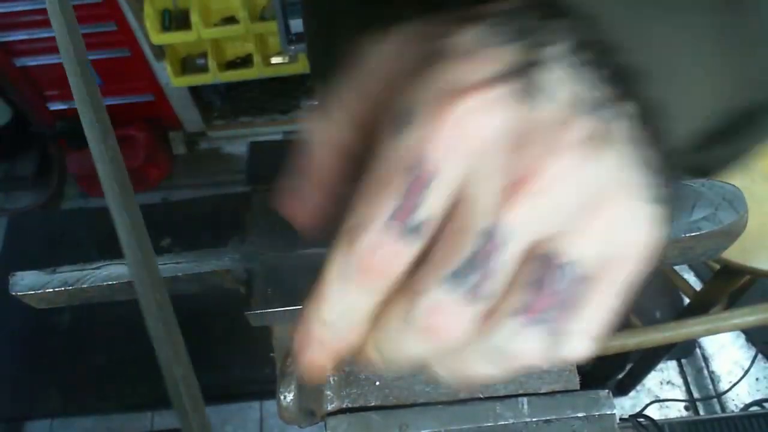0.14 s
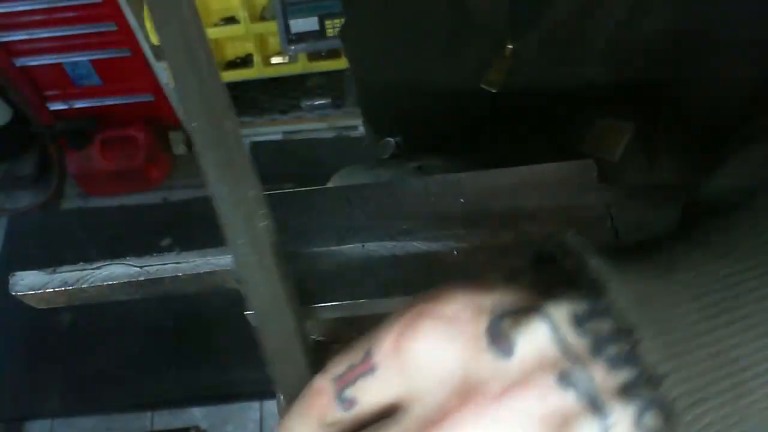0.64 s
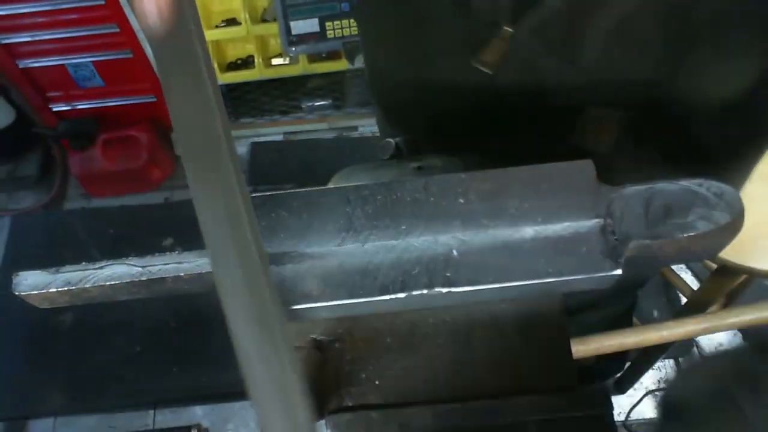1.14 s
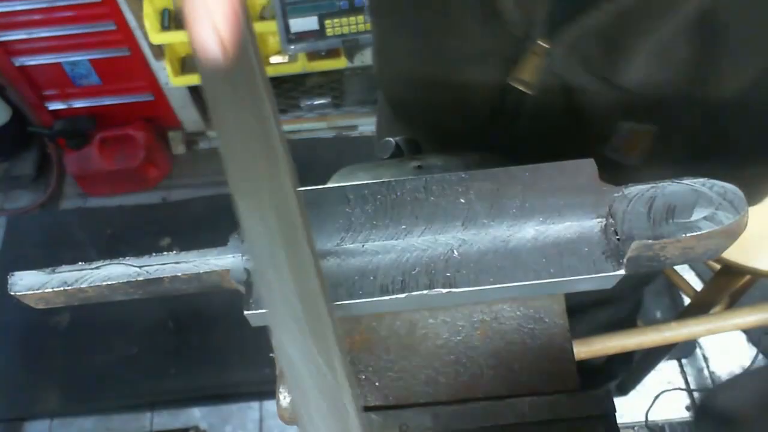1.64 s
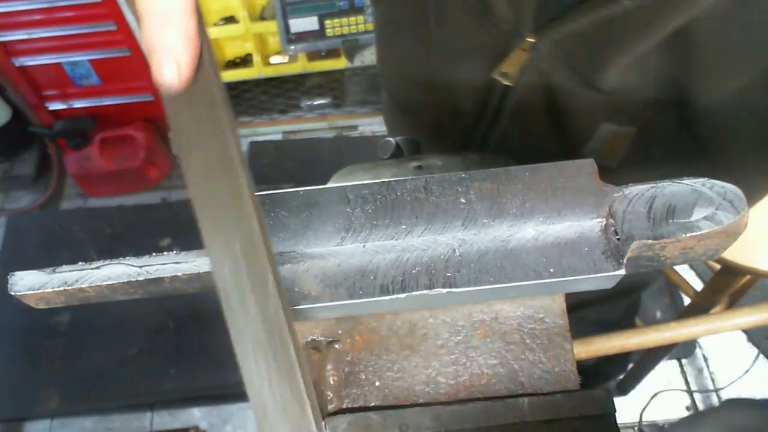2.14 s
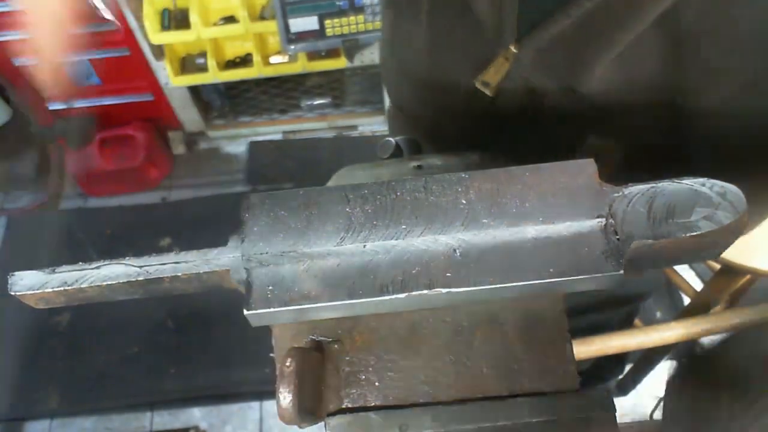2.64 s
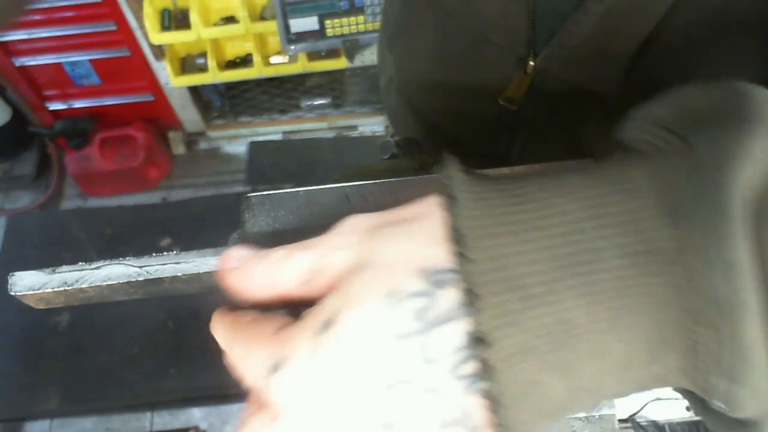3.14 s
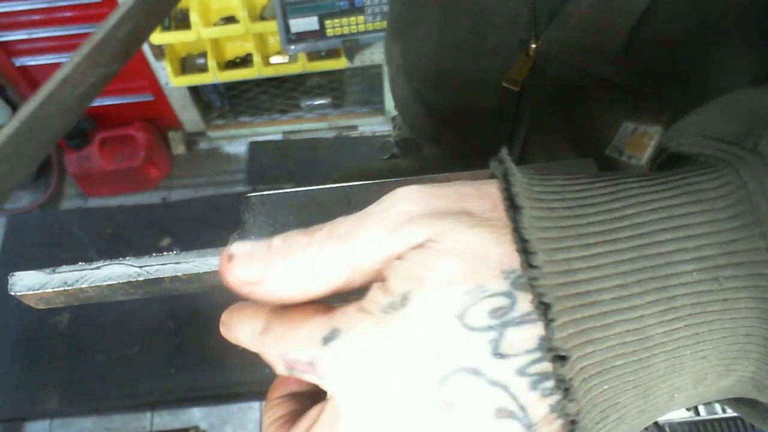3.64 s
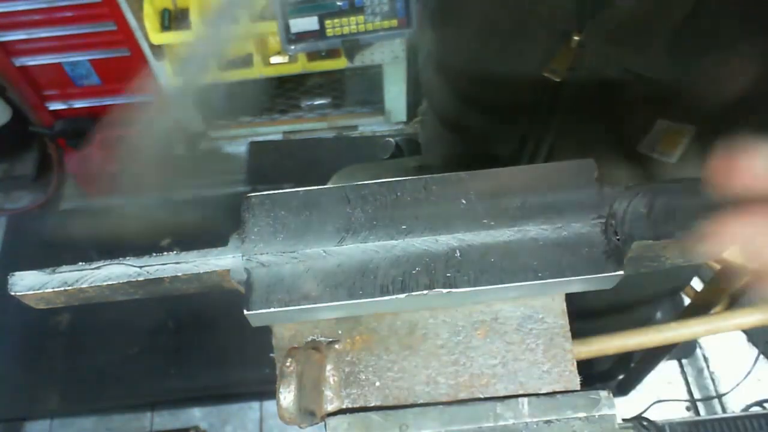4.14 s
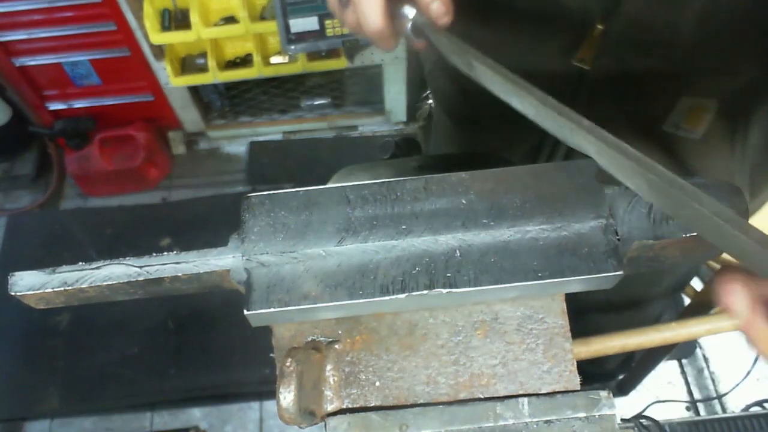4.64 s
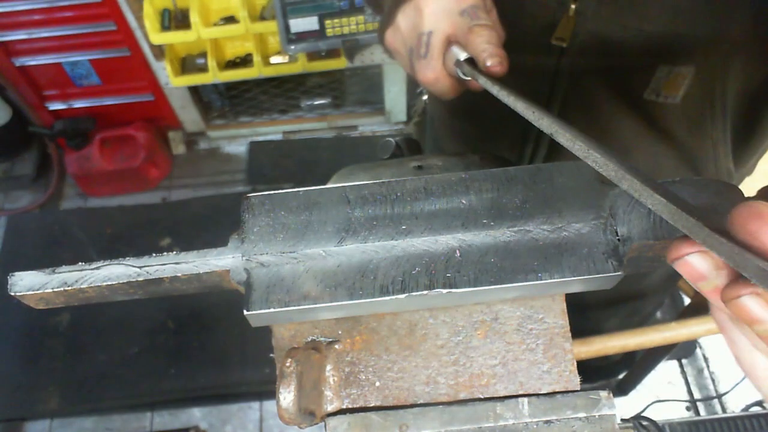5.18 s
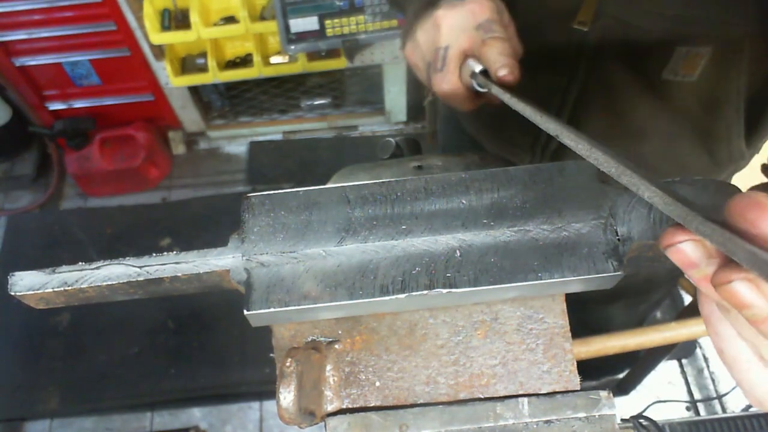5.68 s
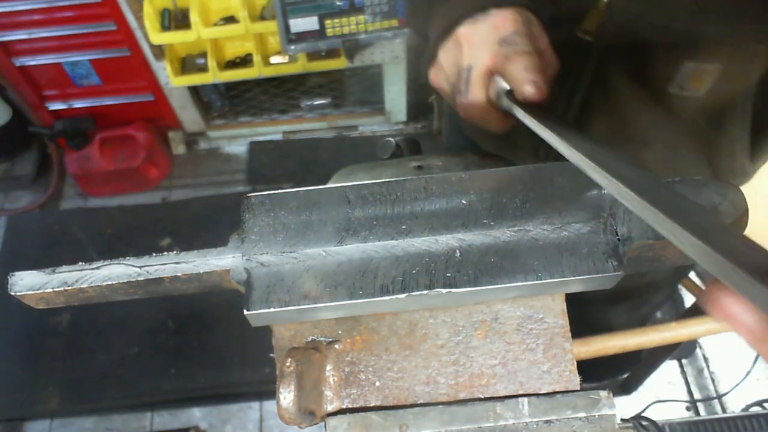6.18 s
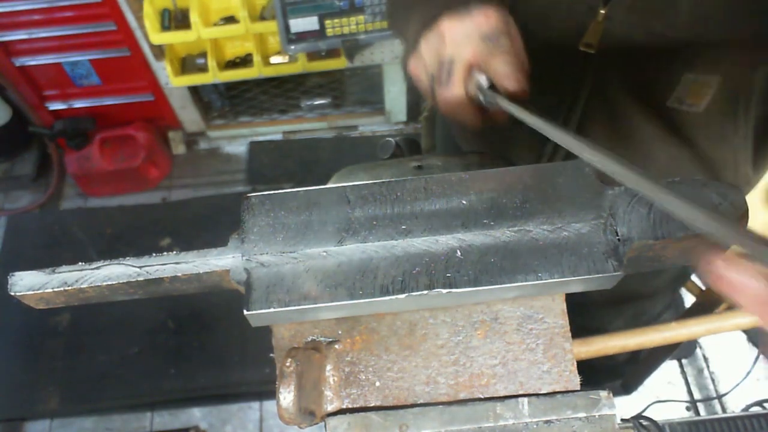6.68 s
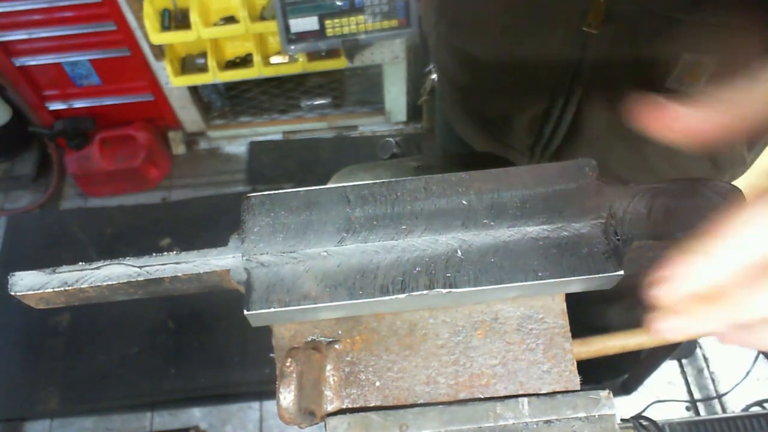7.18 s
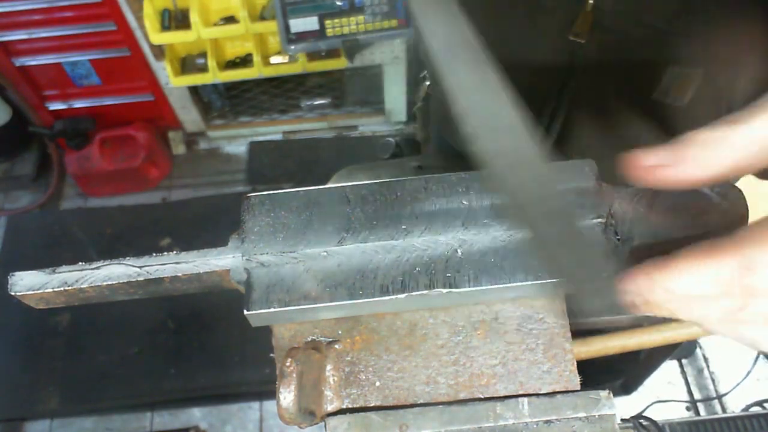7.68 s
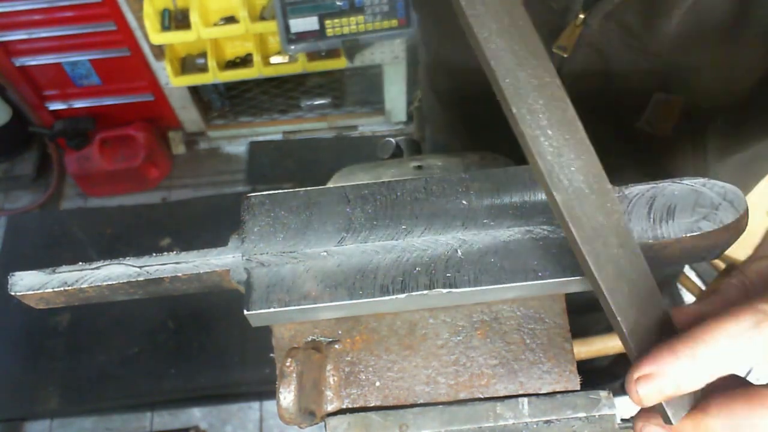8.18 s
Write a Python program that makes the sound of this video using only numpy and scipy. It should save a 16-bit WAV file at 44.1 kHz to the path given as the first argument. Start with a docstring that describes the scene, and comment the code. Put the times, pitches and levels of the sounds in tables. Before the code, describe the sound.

A close, dry workshop sound, left channel only, with quiet hiss, a thin rapidly chopped electronic whine and faint low bench shake throughout. From 0 to 1 s a hand rubs over steel, with light metal taps and dull bench thuds around 0.4 to 0.9. From about 1.0 to 2.5 s short file strokes rasp, each a tenth or two long, gritty and high, with buzzy vise squeals and small snags; a sharper tap lands at 1.7. Then a quieter stretch: skin and sleeve rubs, tiny ticks, a dull thud near 3.9, a clear metal tap at 4.6 and smaller ones after. Faint file contact at 5.4 and scattered taps precede a second run, 6.0 to 6.8 s, louder and brighter, strongest near 6.2 and 6.5, squealing as it ends. A rub at 6.9, then hard ringing metal knocks at 7.5, 7.9 and 8.0, and a faint last tap.

```python
"""Close to a small camera in a shop, its hiss and frame-chopped whine run throughout over a faint bench shake.
Hand rubs, light taps and dull bench thuds lead to a run of short file strokes over a steel block in a vise.
After a pause with rubs, ticks and taps, a second run follows with the file gripped in both hands and ringing
at other pitches; hard taps end it. Each passing tooth kicks the vise and tears gritty chips that ring file and
block; contacts are noise bursts or impulses into decaying modes. Only the left channel carries sound."""
import sys
import numpy as np
from scipy import signal
from scipy.fft import rfft, irfft
from scipy.io import wavfile
from scipy.ndimage import uniform_filter1d

SR = 44100
rng = np.random.default_rng(int(sys.argv[2]) if len(sys.argv) > 2 else 0)


def materialize(psi):
    """Save the field psi as 16-bit PCM at rate SR to the path in sys.argv[1].

    A 1-D psi becomes a single channel; in a 2-D psi each row is a channel.
    """
    bounded = np.clip(np.atleast_2d(psi).T, -1, 1)
    quanta = np.round(bounded * 32767).astype(np.int16)
    wavfile.write(sys.argv[1], SR, quanta)


def magnitude_from_level(level_db):
    """Linear magnitude for a level in decibels (20 dB per decade)."""
    exponent = np.asarray(level_db, float) / 20
    return 10 ** exponent


N = 366644
T = np.arange(N) / SR

# resonances of the steel block: (frequency [Hz], relative level [dB], t60 before damping [s])
BLOCK_MODES = [(5370, -12.5, 0.09), (5635, -22, 0.36), (7100, -13, 0.059), (10450, -12, 0.057),
               (12300, -30, 0.1), (14680, -30, .1)]
# resonances of the vise: (frequency [Hz], relative level [dB], t60 before damping [s])
VISE_MODES = [(253, -10.5, 0.2), (357.8, -3.5, 0.068), (483, -7.5, 0.036), (538, -32.5, 0.99),
              (624, -3.5, .12), (672.7, -6.5, 0.062), (1144, -11.5, 0.062), (1266, -4.5, 0.037),
              (1445, -3.5, 0.021), (1885, -14.5, 0.089)]


def unit(x):
    """Scale to rms 1."""
    return x / np.sqrt(np.mean(x ** 2))


def colour(x, table):
    """Shape the spectrum through (frequency [Hz], gain [dB]) points, joined on a log frequency axis."""
    hz, db = np.transpose(table)
    f = np.arange(len(x) // 2 + 1) * SR / len(x)
    gain = magnitude_from_level(np.interp(np.log(f + 1), np.log(hz), db))
    return irfft(rfft(x) * gain, len(x))


def band(x, lo_hz, hi_hz):
    """Band-pass between two corner frequencies."""
    return signal.sosfilt(signal.butter(2, [lo_hz, hi_hz], "band", fs=SR, output="sos"), x)


def walk(rate):
    """Random levels, `rate` new ones per second, joined by ramps; rms near 1."""
    k = int(SR / rate)
    steps = np.repeat(rng.standard_normal(N // k + 1), k)
    return unit(uniform_filter1d(steps, k)[:N])


def bumps(table, width_s):
    """Gain that swells briefly at each (time [s], level [dB])."""
    return magnitude_from_level(sum(db * np.exp(-((T - s) / width_s) ** 2) for s, db in table))


def mode(x, hz, db, t60):
    """One decaying resonance; a unit impulse starts it ringing at the given level."""
    r = np.exp(-np.log(1000) / (t60 * SR))
    w = 2 * np.pi * hz / SR
    return magnitude_from_level(db) * signal.lfilter([np.sin(w)], [1, -2 * r * np.cos(w), r * r], x)


def ring(x, modes, wander_db=0., damp=0.99):
    """All modes of a body; the moving contact point makes each swell and fade alone; damp scales the t60s."""
    return sum(mode(x * magnitude_from_level(wander_db * walk(25)), hz, db, t60 * damp) for hz, db, t60 in modes)


def file_ring(force, wander_db, damp):
    """The file rings at other pitches held at both ends than by its handle."""
    # both: (frequency [Hz], relative level [dB], t60 before damping [s])
    two_hand_modes = [(2928, -7.5, 0.25), (3990, -7, 0.14), (5270, -10, .15), (6200, -17.5, 0.07),
                      (6700, -1.5, 0.15), (7560, -19, 0.11), (8227, -2, 0.12), (8540, -2.5, 0.052),
                      (9130, -9, 0.082), (9300, -8, 0.037), (10460, -13.5, .1)]
    handle_modes = [(2318, -16.5, 0.22), (2500, -10.5, 0.028), (3112, -10, 0.11), (3826, -18, 0.33),
                    (4188, -3.5, 0.07), (5281, -5, 0.21), (5560, -10, 0.043), (6687, 0, .08),
                    (8090, -5, 0.12), (8750, -0.5, 0.05), (9460, -9.5, 0.12), (10620, -12.5, 0.17)]
    two_handed = (T > 4.3) & (T < 6.88)  # s
    both_ends = ring(force * two_handed, two_hand_modes, wander_db, damp)
    return both_ends + ring(force * ~two_handed, handle_modes, wander_db, damp)


def camera():
    """Preamp hiss, and the sensor read-out: a whine that restarts every frame and rests between frames."""
    # hiss colour: (frequency [Hz], relative density [dB per Hz])
    hiss_colour = [(60, -8.5), (170, -7.5), (250, -3.5), (820, -13), (1330, -10), (2340, -21), (12000, -21),
                   (16000, -21.5)]
    # harmonics 1-4 of the sensor row rate: rms level while reading [dB]
    row_db = [-94, -72.6, -91, -74.5]
    # unchopped whistles: (frequency [Hz], rms level [dB])
    steady = [(3891.1, -92), (8000.1, -95.5), (12435., -90)]
    frame_hz, row_hz = 30.0023, 3293.2
    frame = (T * frame_hz + .37) % 1
    reading = uniform_filter1d(1. * (frame < .81), size=20)  # softened switching
    rows = 2 * np.pi * row_hz * frame / frame_hz
    whine = sum(magnitude_from_level(db) * np.sin(k * rows) for k, db in enumerate(row_db, start=1))
    whistles = sum(magnitude_from_level(db) * np.sin(2 * np.pi * hz * T) for hz, db in steady)
    hiss = magnitude_from_level(-71) * unit(colour(rng.standard_normal(N), hiss_colour))
    return np.sqrt(2) * (reading * whine + whistles) + hiss  # sqrt(2): sine rms to peak


def bench():
    """Bench shake reaches the camera as slow low noise; knocks ring the low bench modes."""
    # bench shake: (time [s], relative level under 50 Hz [dB], relative level at 50-100 Hz [dB])
    shake = [(0.0, -85, -90), (0.11, -75, -76), (0.99, -60.5, -57.5), (5.62, -78, -58), (6.09, -59, -66),
             (6.73, -56, -63), (7.08, -67.5, -68.5), (8.31, -74.5, -72)]
    # dull knocks: (time [s], relative level [dB], upper modes over that level [dB])
    thuds = [(0.416, -57.5, -19), (0.675, -58.5, -20), (0.857, -62.5, -4.5), (2.243, -53.5, -6),
             (3.24, -61.5, -17), (3.879, -60.5, -0.5), (3.937, -48, -13.5), (4.287, -69, -30)]
    # bench resonances: (frequency [Hz], relative level [dB], t60 before damping [s])
    bench_modes = [(74.8, 8, 0.36), (110.7, 2.5, 0.48), (233.5, 1.5, 0.19), (480, -7.5, 0.15)]
    s, sub_db, bass_db = np.transpose(shake)
    sub = unit(band(rng.standard_normal(N), 22, 42)) * magnitude_from_level(np.interp(T, s, sub_db))
    bass = unit(band(rng.standard_normal(N), 48, 99)) * magnitude_from_level(np.interp(T, s, bass_db) - 13.0)
    low, upper = np.zeros((2, N))
    for s, db, upper_db in thuds:
        low[int(s * SR)] += magnitude_from_level(db)
        upper[int(s * SR)] += magnitude_from_level(db + upper_db)
    knocks = magnitude_from_level(-5.0) * ring(low, bench_modes[:2]) + magnitude_from_level(3.0) * ring(upper, bench_modes[2:])
    return knocks + sub + bass


def rubs():
    """Fine uneven hiss of skin on steel, with a duller rustle of the sleeve."""
    # skin and cloth rubbing: (start [s], length [s], relative hiss level [dB], rustle over hiss [dB])
    hand_rubs = [(0.023, 0.32, -85, 3.5), (0.877, 0.073, -93, 21), (2.5, 0.95, -88, 5.5),
                 (2.881, 0.39, -79, -20), (4.095, 0.15, -76, -2.5), (4.505, 0.066, -74.5, 7.5),
                 (4.699, 0.13, -99, 17.5), (5.66, 0.23, -80, 9), (6.924, 0.11, -76.5, -1)]
    hiss, rustle = np.zeros((2, N))
    for s, length, db, rustle_db in hand_rubs:
        i = int(s * SR)
        shape = signal.windows.tukey(int(length * SR), 0.28)  # share spent swelling and fading
        hiss[i:i + len(shape)] += magnitude_from_level(db) * shape
        rustle[i:i + len(shape)] += magnitude_from_level(db + rustle_db) * shape
    fine = unit(band(rng.standard_normal(N), 5930, 11100)) * magnitude_from_level(2.2 * walk(40))
    dull = unit(band(rng.standard_normal(N), 170, 1700)) * magnitude_from_level(3.0 * walk(65))
    return hiss * fine + rustle * dull


def taps():
    """Each tap is a few ms of rattling contact that rings file, block and vise; ticks reach only the top modes."""
    # metal taps: (time [s], relative level [dB], vise tone over that level [dB], rattle time constant [ms])
    metal_taps = [(0.3952, -67, -7, 7.7), (0.4132, -44, 0.5, 9.9), (0.455, -53.5, 2, 10),
                  (0.6708, -55.5, 4.5, 21), (0.7704, -65, 3, 17), (1.008, -53, 4.5, 5.3),
                  (1.6746, -33.5, -11.5, 7.3), (4.5885, -37, -14.5, 9.7), (4.666, -44.5, 4, 16.5),
                  (4.8335, -64, 8.5, 16), (5.3635, -47.5, 6, 9), (5.7458, -57.5, 3, 8.1),
                  (5.789, -50, -6, 6.8), (5.8052, -54.5, 4.5, 11), (5.9685, -48.5, -5, 9),
                  (6.0645, -42, -9.5, 9), (6.3455, -35.5, -9.5, 6), (6.9082, -49.5, -1, 7.8),
                  (7.5307, -18.5, -29.5, 8.9), (7.8663, -21.5, -15.5, 9.37), (8.0331, -25, -14, 10.34),
                  (8.1175, -56, -0.5, 19.5)]
    # light fingertip and chip ticks on the block: (time [s], relative level [dB])
    ticks = [(2.5716, -59), (2.609, -44), (3.098, -58), (3.144, -61.5), (3.3942, -57.5), (5.723, -57),
             (5.8619, -50)]
    steel, vise, crack, tick, body = np.zeros((5, N))
    t = np.arange(4096) / SR
    for s, db, tone_db, ms in metal_taps:
        chance = rng.standard_normal(len(t))
        length, i = ms / 1000, int(s * SR)
        decay = np.exp(-t / length) + 1.37 * np.exp(-t / 0.0012)  # rattle and sharp onset
        burst = magnitude_from_level(db) * chance * np.minimum(t / 0.00089, 1) * decay
        force = burst / np.sqrt(length * SR)  # evens out the drive of long and short rattles
        steel[i:i + len(t)] += force
        vise[i:i + len(t)] += magnitude_from_level(tone_db) * force
        crack[i:i + len(t)] += burst
        body[i:i + len(t)] += magnitude_from_level(db + tone_db) * chance * np.exp(-t / 0.038)
    for s, db in ticks:
        i = int(s * SR)
        tick[i:i + len(t)] += magnitude_from_level(db) * rng.standard_normal(len(t)) * np.exp(-t / 0.0011)
    tick = band(tick, 7650, 12000)
    rings = magnitude_from_level(-5.5) * file_ring(steel, 2.3, 0.59) + magnitude_from_level(-7.5) * ring(steel, BLOCK_MODES, 1.07)
    rings += magnitude_from_level(2.5) * ring(vise, VISE_MODES, 2.5, 0.7)
    rumble = magnitude_from_level(4) * band(body, 190, 480)  # the heavy base answers, short and dull
    cracks = magnitude_from_level(-15.5) * band(crack, 999.5, 11000)
    light = magnitude_from_level(-10.0) * ring(tick, BLOCK_MODES[2:], 6.96, 0.99) + magnitude_from_level(-3.5) * tick
    return rings + rumble + cracks + light


def filing():
    """A kick per tooth drives the vise; chips tear in a gritty burst behind each tooth and ring the steel."""
    # the teeth lock to the vise and it squeals: (time [s], gain over the tooth tone [dB])
    squeals = [(1.154, 8), (1.957, 9.5), (1.992, 11), (2.03, 9.5), (2.325, 10), (2.362, 11), (6.215, 4),
               (6.265, 6), (6.52, 1), (6.62, 10.5), (6.722, 6.5)]
    # the tooth rate heard through the block: (multiple of the rate, relative level [dB])
    buzz_partials = [(1, -8.5), (2, -11.5), (3, -14.5), (4, -19)]
    # chip noise colour: (frequency [Hz], relative density [dB per Hz])
    rasp_colour = [(820, -35.5), (1400, -7), (3500, -5.5), (5230, -0.5), (5900, -4), (6590, 2.5),
                   (15500, -29.5)]
    rate, push, pull = hand()
    lock = bumps(squeals, .014)
    phase = np.cumsum(rate * (1 + .09 * walk(250))) / SR  # teeth passed, unevenly spaced
    kick = np.diff(np.floor(phase), prepend=0) * np.sqrt(SR / rate)
    tooth = kick * magnitude_from_level(2.2 * rng.standard_normal(N))
    specks = rng.standard_normal(N) * magnitude_from_level(0.87 * rng.standard_exponential(N))
    grit = unit(specks * (0.44 + np.exp(-(phase % 1) / 0.93)))
    bite = (0.3 * tooth + grit) * magnitude_from_level(1.7 * walk(70))
    # cutting contact shortens the ring of the file
    steel = magnitude_from_level(-28.5) * file_ring(push * bite, 5.2, 0.23)
    steel += magnitude_from_level(-29.5) * ring(push * bite, BLOCK_MODES, 5.0)
    chips = magnitude_from_level(-5.5) * push * unit(colour(bite, rasp_colour))
    vise = magnitude_from_level(-28.0) * ring(pull * (lock * tooth + 0.38 * grit), VISE_MODES, 4.8, 0.92)
    turn = 2 * np.pi * np.cumsum(rate * (1 + 0.023 * walk(60))) / SR
    partials = sum(magnitude_from_level(db + 3 * walk(50)) * np.sin(k * turn) for k, db in buzz_partials)
    buzz = pull * lock * partials
    low_grit = magnitude_from_level(-7.5) * pull * unit(band(0.33 * tooth + grit, 250, 1600))
    return steel + chips + vise + buzz + low_grit


def hand():
    """Tooth rate from the hand speed, and the rasp and vise gains of all strokes."""
    # file strokes: (full contact [s], held [s], relative rasp level at first [dB], at last [dB],
    # vise tone over rasp [dB])
    strokes = [(1.05, .1, -47.5, -44, 1.5), (1.249, 0.097, -39, -38, -0.5), (1.423, .11, -34, -47, -1.5),
               (1.703, .047, -52.5, -58.5, -0.5), (1.924, 0.084, -51, -44, 2.5), (2.1, 0.12, -46.5, -56, 2),
               (2.291, 0.049, -37, -44, 1), (2.468, 0.011, -57.5, -69.5, 8),
               (5.385, 0.0095, -63.5, -58, 15), (5.997, 0.0099, -33.5, -40.5, -1.5),
               (6.082, 0.015, -49, -49.5, 3.5), (6.173, .1, -26, -28.5, -10),
               (6.351, 0.087, -37, -40, -4.5), (6.507, 0.11, -21.5, -31, -13.5),
               (6.717, 0.051, -40, -42, 2)]
    # hand speed before jitter: (time [s], teeth passing [1/s])
    speed = [(1.02, 457), (1.11, 770), (1.15, 690), (1.205, 330), (1.3, 456), (1.4, 300), (1.49, 450),
             (1.6, 284), (1.89, 457), (1.955, 665), (2.0, 622), (2.035, 324), (2.22, 330), (2.295, 542),
             (2.33, 500), (2.365, 330), (5.36, 430), (5.44, 297), (5.97, 277), (6.0, 398), (6.05, 317),
             (6.1, 450), (6.15, 360), (6.22, 660), (6.29, 617), (6.33, 493), (6.36, 690), (6.43, 476),
             (6.48, 320), (6.52, 600), (6.62, 596), (6.725, 670), (6.765, 694), (6.805, 330)]
    # the file snags on a burr: (time [s], gain over the rasp [dB])
    snags = [(1.297, 5), (1.329, 12.5), (1.972, 13), (2.294, 3), (6.005, 8), (6.423, 10.5)]
    leave_s, vise_leave_s = .05, .089  # the vise is driven on while the file slows
    push = sum(contact(s, held, a_db, b_db, leave_s) for s, held, a_db, b_db, _ in strokes)
    pull = sum(contact(s, held, a_db + db, b_db + db, vise_leave_s) for s, held, a_db, b_db, db in strokes)
    return np.interp(T, *np.transpose(speed)), push * bumps(snags, .005), pull


def contact(s, held, first_db, last_db, leave_s):
    """Gain of one stroke: set down, pressed, held, lifted off."""
    touch_db, land_s = -74.5, 0.041  # gain as the file barely touches; time to press down
    end = s + held
    times = [s - land_s - .002, s - land_s, s, end, end + leave_s, end + 2 * leave_s]
    return magnitude_from_level(np.interp(T, times, [-140, touch_db, first_db, last_db, touch_db, -140]))


def scene():
    """The work sounds with the short noise tail of a small shop; the right channel is dead."""
    work = band(filing() + taps() + rubs(), 220, 13000)
    t = np.arange(SR // 2) / SR
    decay = np.exp(-np.log(1000) * t / 0.13) * (t > .005)  # t60 [s], first return [s]
    tail = band(rng.standard_normal(len(t)), 270, 7000) * decay
    room = signal.fftconvolve(work, tail / np.sqrt(np.sum(tail ** 2)))[:N]
    return np.array([work + magnitude_from_level(-20) * room + bench(), np.zeros(N)])


def record(dry):
    """One microphone on the left channel, with the camera's own noise, a small offset and a hard top cut."""
    left = magnitude_from_level(6) * dry[0] + camera() - .00256
    top = signal.ellip(10, .3, 70, 15800, fs=SR, output="sos")
    return np.array([signal.sosfilt(top, left), dry[1]])


dry = scene()
out = record(dry)
materialize(out)
```